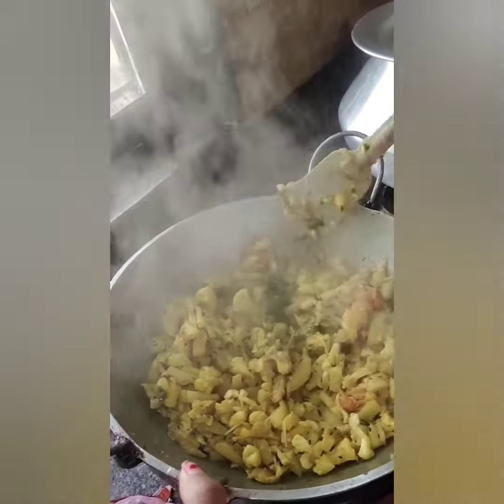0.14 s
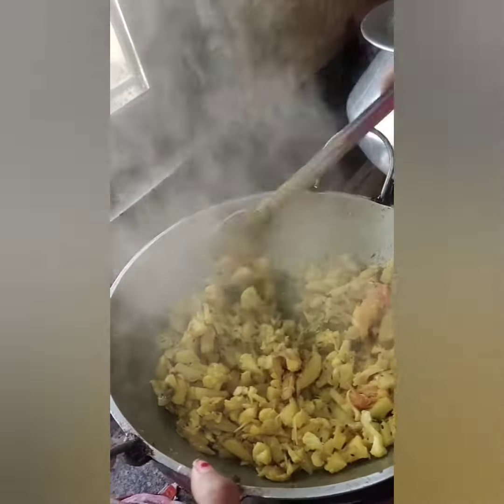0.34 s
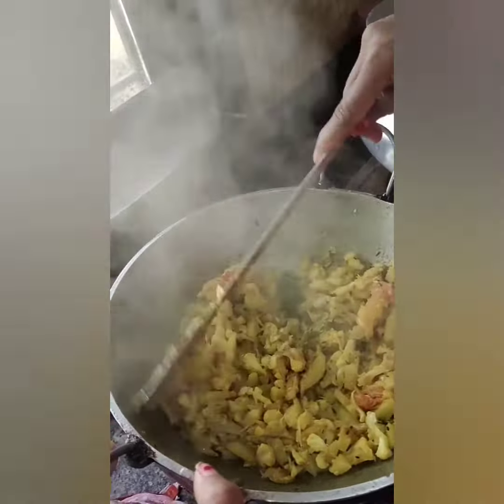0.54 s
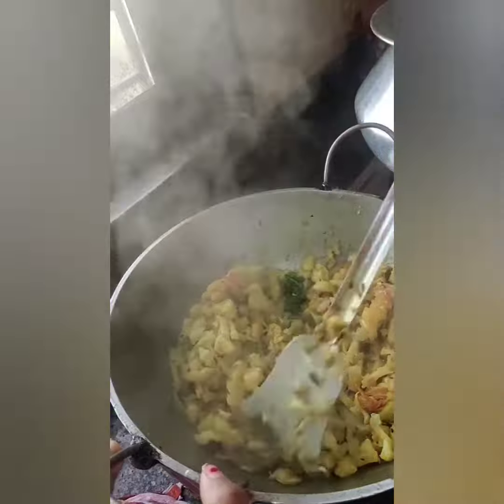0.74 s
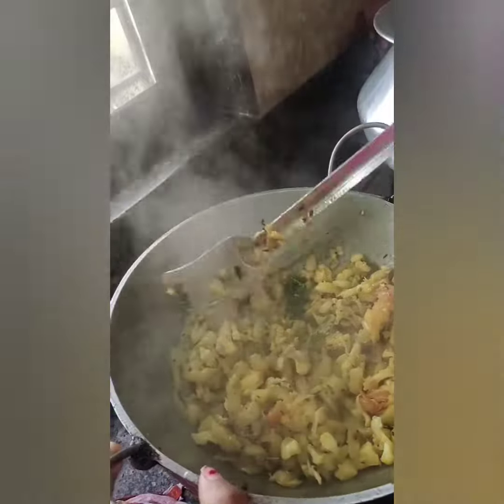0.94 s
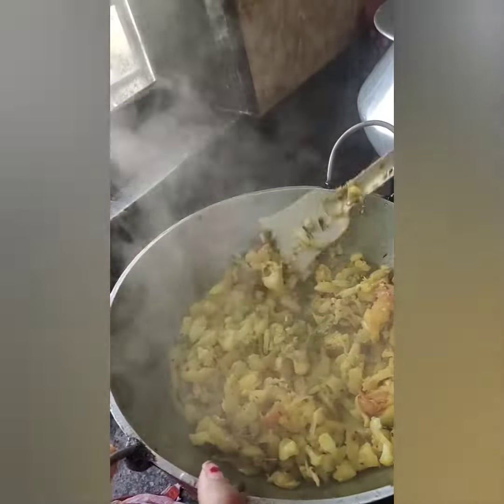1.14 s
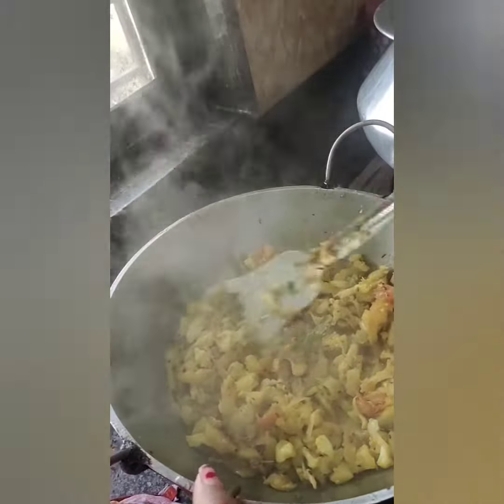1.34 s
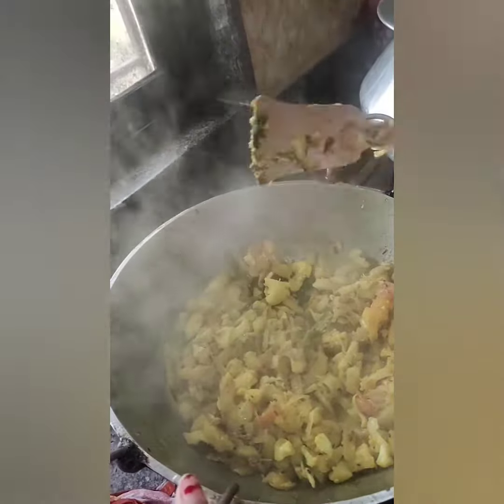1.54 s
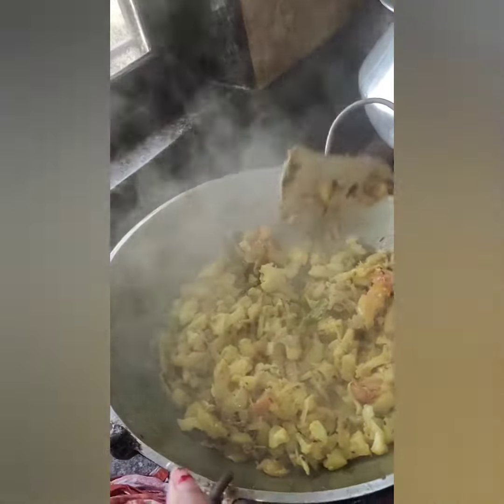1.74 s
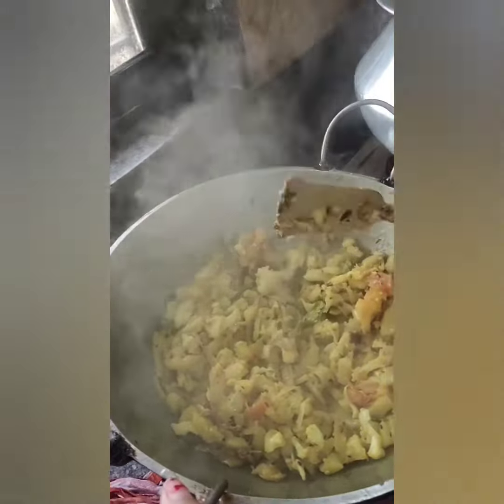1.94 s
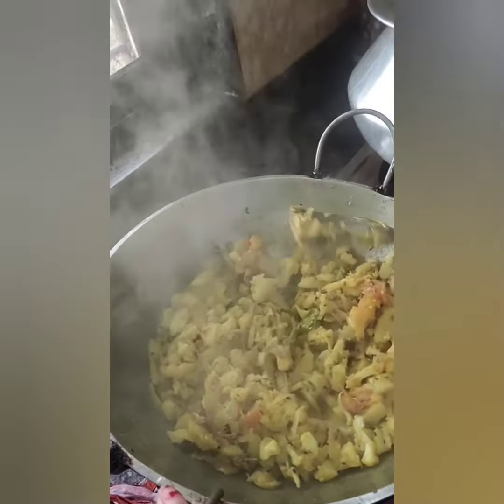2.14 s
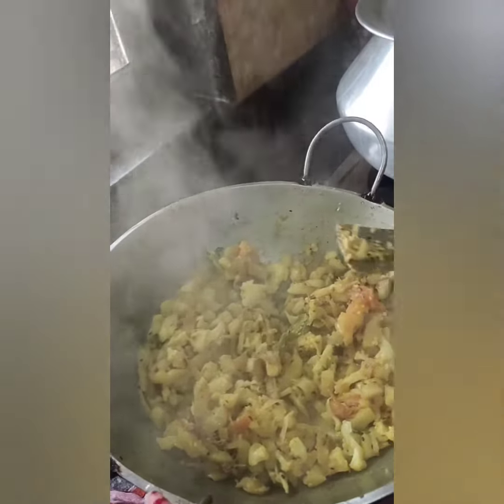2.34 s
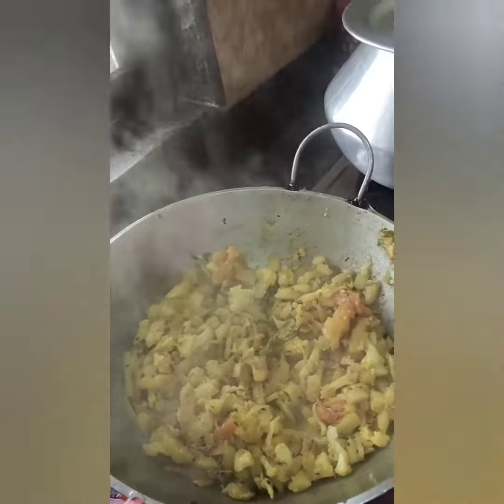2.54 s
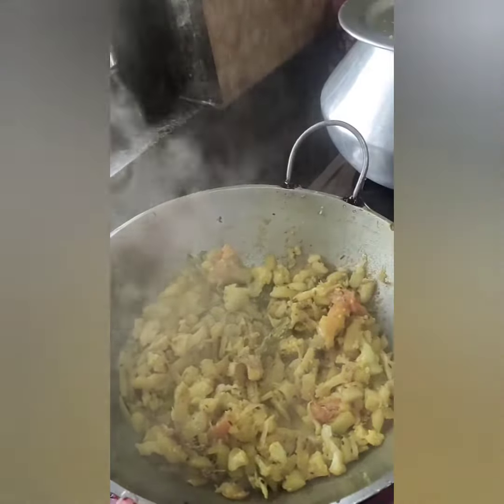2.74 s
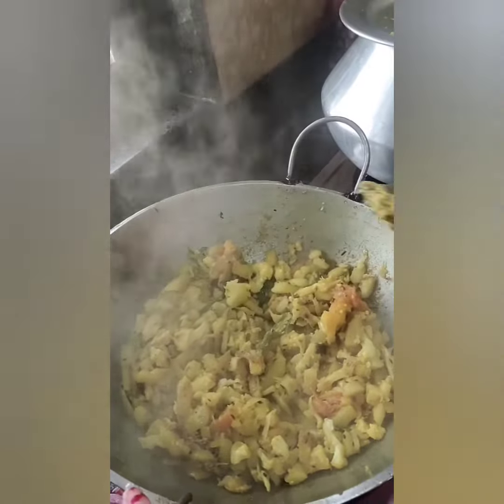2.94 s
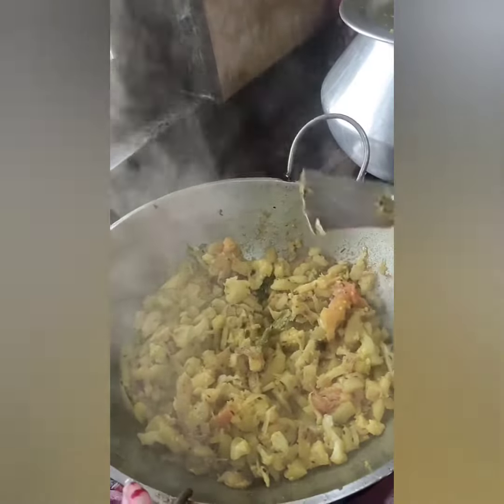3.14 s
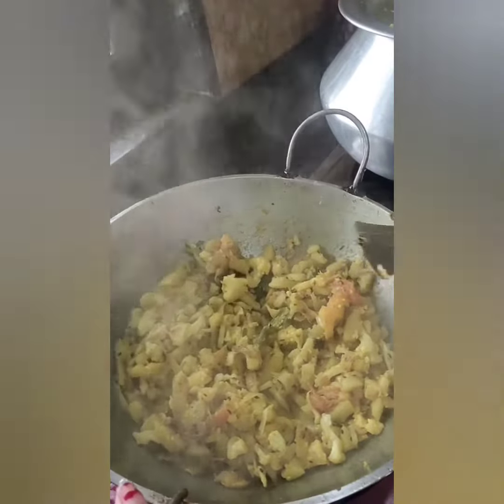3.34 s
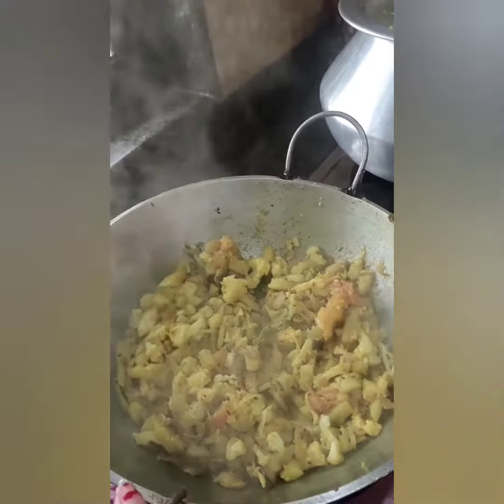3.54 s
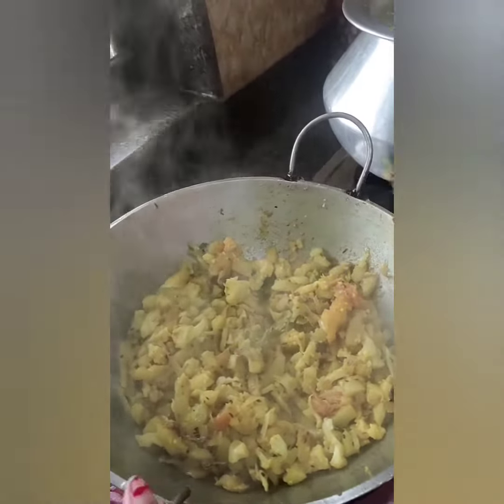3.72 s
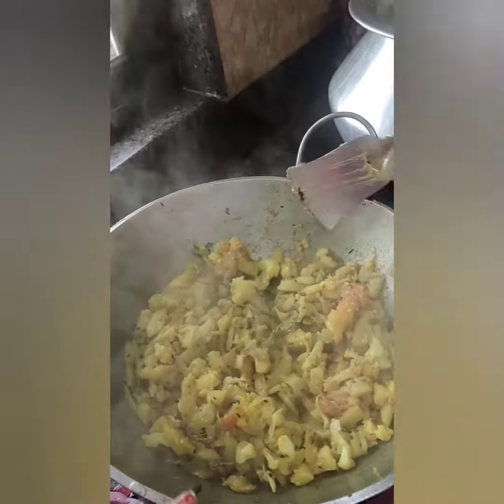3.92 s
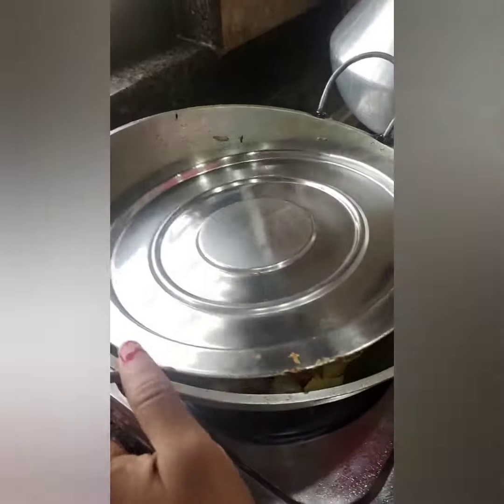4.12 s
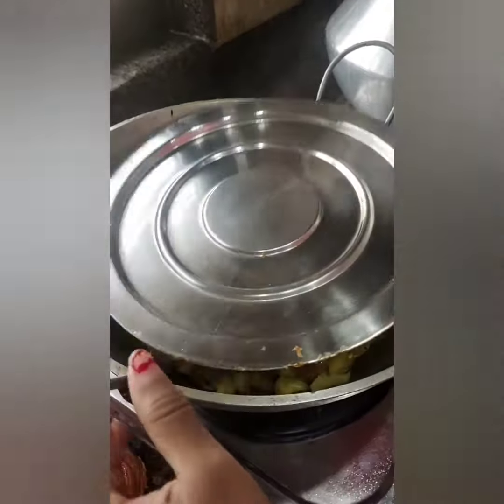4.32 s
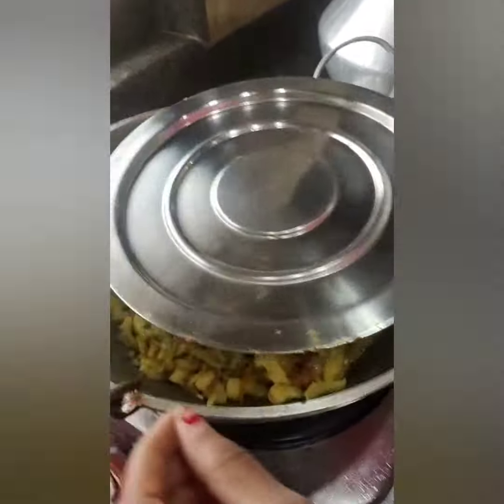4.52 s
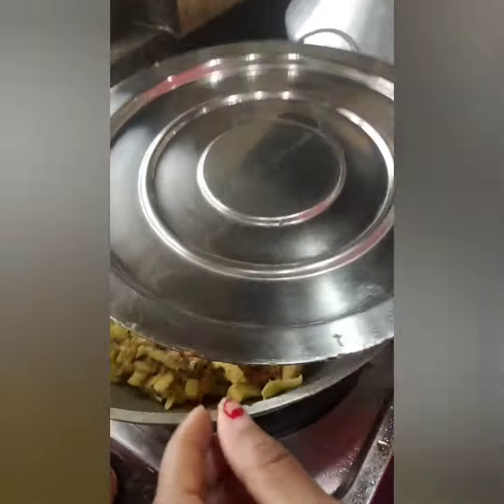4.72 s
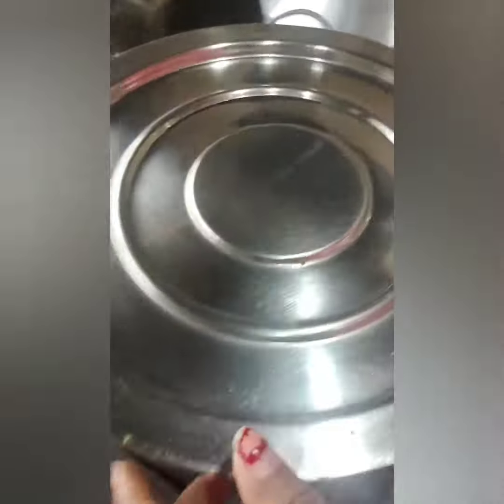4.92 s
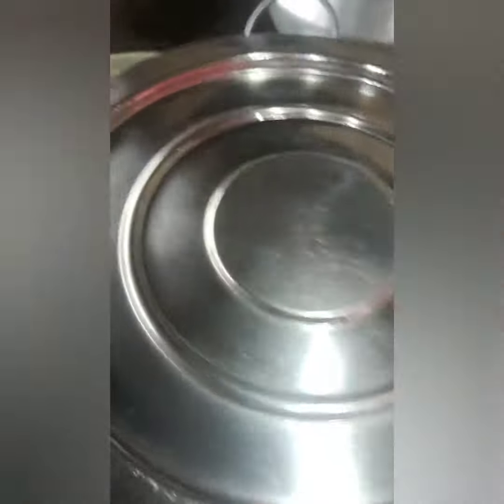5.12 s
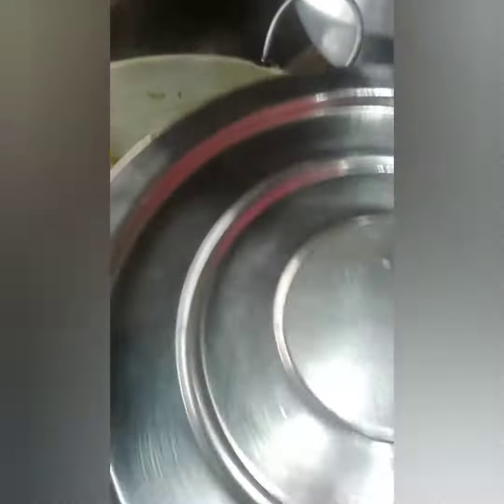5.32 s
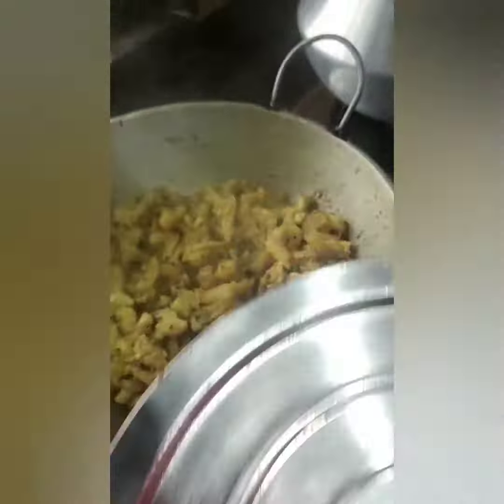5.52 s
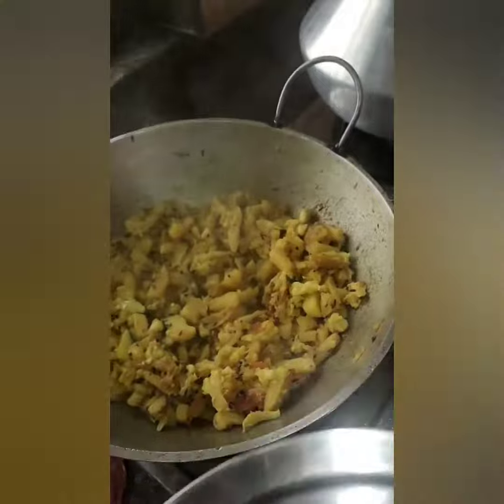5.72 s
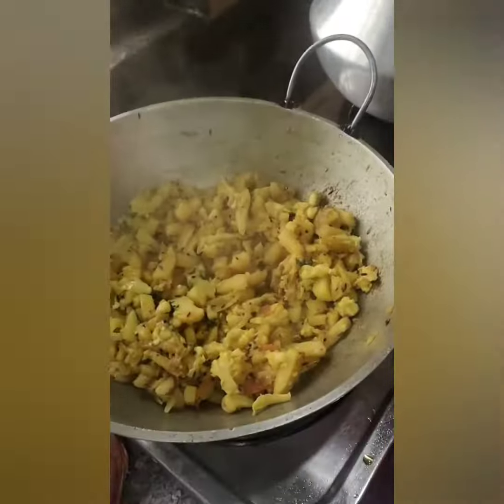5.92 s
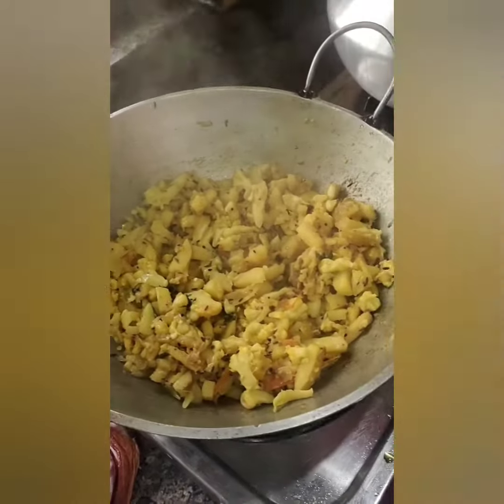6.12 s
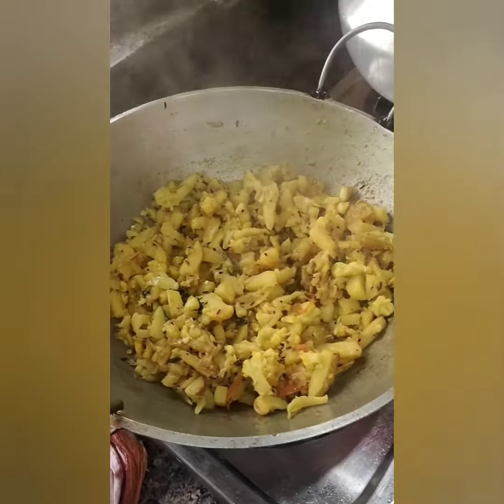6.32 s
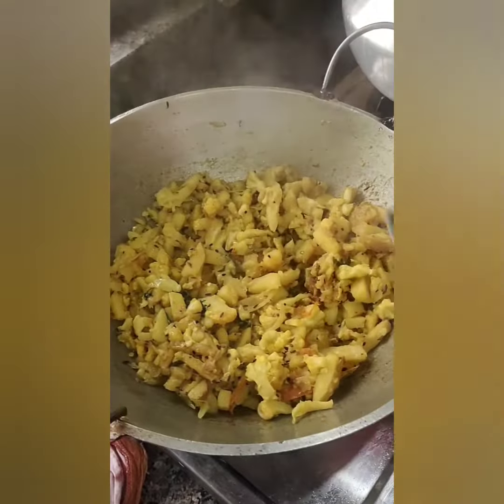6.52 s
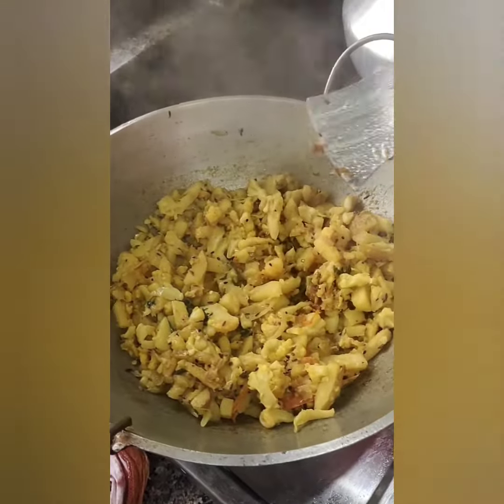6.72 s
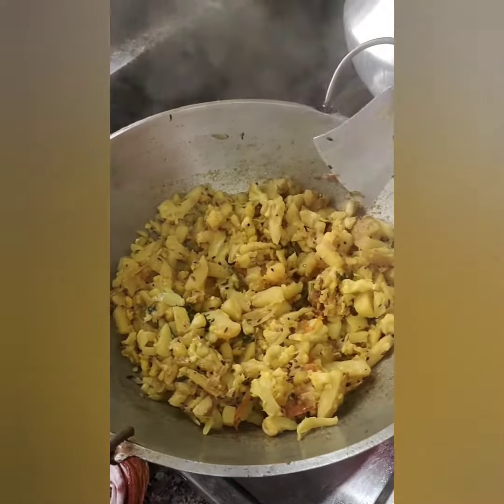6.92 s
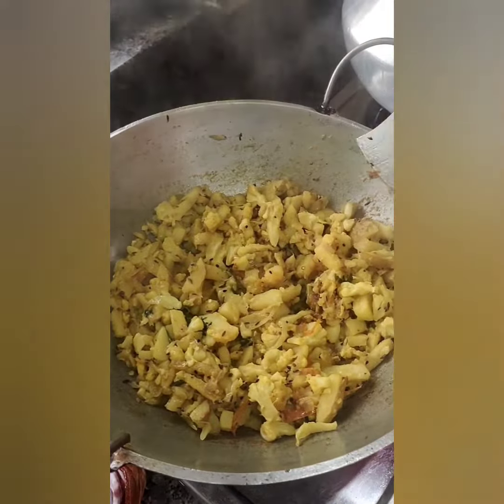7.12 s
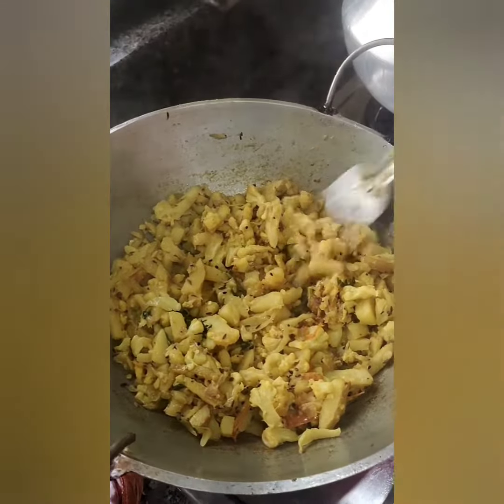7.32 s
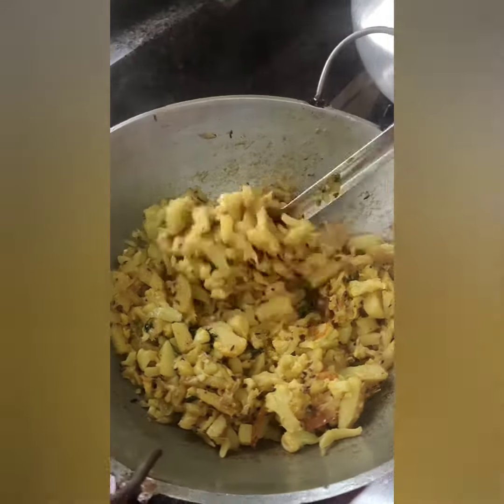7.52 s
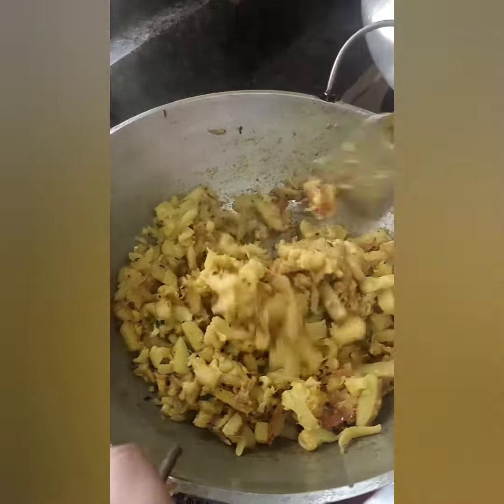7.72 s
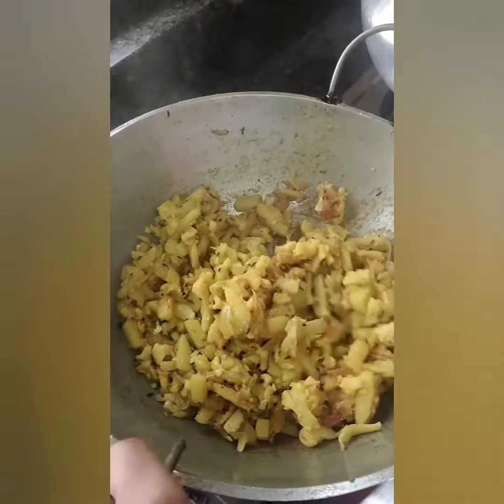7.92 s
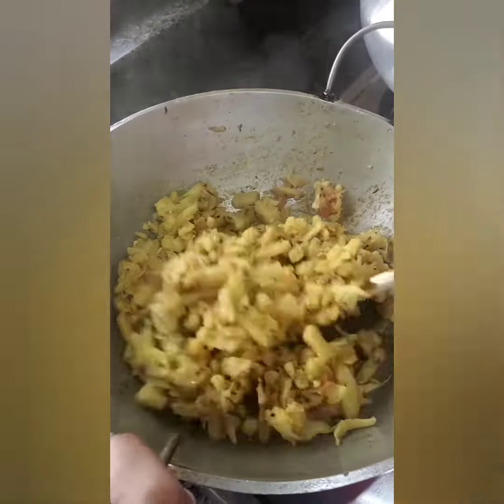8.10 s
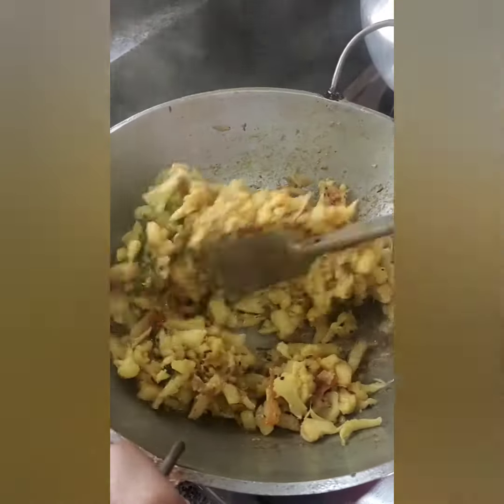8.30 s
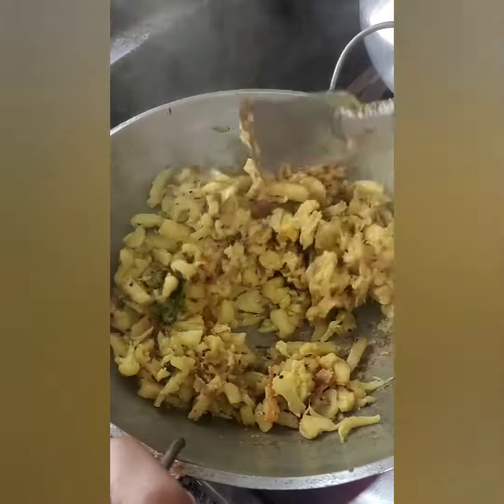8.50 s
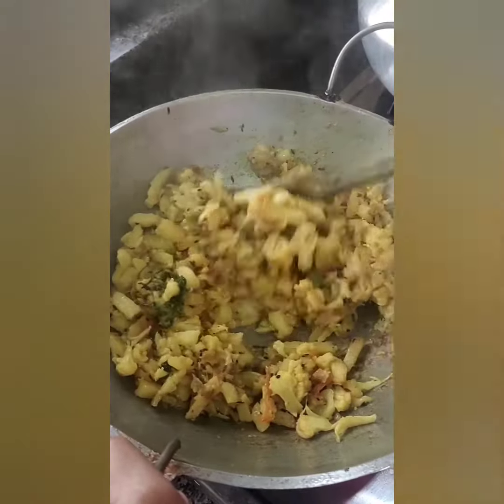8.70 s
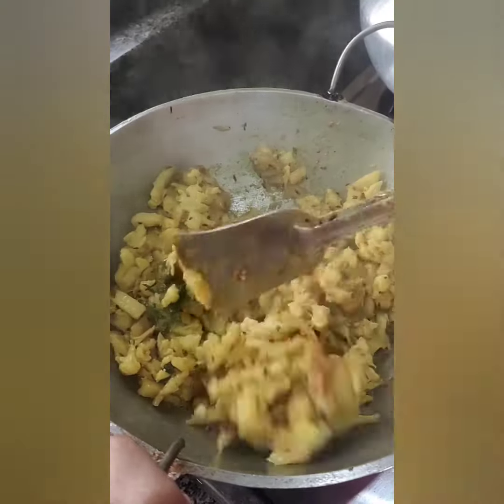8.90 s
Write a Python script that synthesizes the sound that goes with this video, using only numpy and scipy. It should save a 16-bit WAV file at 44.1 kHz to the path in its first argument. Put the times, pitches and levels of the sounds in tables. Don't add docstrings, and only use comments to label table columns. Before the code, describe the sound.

Vegetables sizzle in a metal pan over a low gas flame while a steel spatula knocks the rim, scrapes the wall and stirs.

```python
import sys
import numpy as np
from scipy import signal
from scipy.fft import rfft, irfft, next_fast_len
from scipy.io import wavfile
from scipy.ndimage import uniform_filter1d, map_coordinates

SR = 44100
rng = np.random.default_rng(int(sys.argv[2]) if len(sys.argv) > 2 else 0)


def volts(x):
    e = np.asarray(x, float) / 20
    return 10 ** e


def output_pcm(signal):
    pcm = np.clip(np.atleast_2d(signal).T, -1, 1) * 32767
    wavfile.write(sys.argv[1], SR, np.round(pcm).astype(np.int16))


N = 395119
FFT_SIZE = 2 * next_fast_len((N + SR // 3) // 2, real=True)

# (frequency [Hz], likeness [0-1])
ALIKE = [(60, .97), (150, .85), (340, .66), (800, .8), (1400, .4), (2300, .48), (5000, .2), (8000, .05)]
# (time [s], peak [dB], bowl answer [dB], chatter t60 [s])
RIM = [
    (1.8491, -12, -6, 0.22),
    (1.9947, -16, -1, 0.14),
    (2.229, -30, -9, 0.094),
    (3.2962, -22, -5.5, 0.15),
]


def unit(x):
    return x / np.sqrt(np.mean(x ** 2) + 1e-20)


def along(points, hz):
    f, value = np.transpose(points)
    return np.interp(np.log(hz + 1), np.log(f + 1), value)


def curve(points):
    s, value = np.transpose(points)
    return np.interp(np.arange(N) / SR, s, value)


def wobble(rate):
    knots = rng.standard_normal(int(N * rate / SR) + 4)
    return map_coordinates(knots, [np.arange(N) * rate / SR], order=1)


def filtered(x, response):
    spectrum = rfft(x, FFT_SIZE) * response(np.fft.rfftfreq(FFT_SIZE, 1 / SR))
    return irfft(spectrum, FFT_SIZE)[..., :N]


def resonances(f, peaks):
    total = 0
    for k, (centre, width, db) in enumerate(peaks):
        total = total + (-1) ** k * volts(db) * 1j * f * width / (centre * centre - f * f + 1j * f * width)
    return total


def ringing(modes):
    hz, db, t60 = np.transpose(modes)[..., None]
    t = np.arange(int(SR * min(t60.max(), 1 / 3))) / SR
    return np.sum(volts(db - 60 * t / t60) * np.sin(2 * np.pi * hz * t), axis=0)


def pair(spectrum, alike, lag_s, source=None):
    source = rng.standard_normal((2, N)) if source is None else source

    def mid_side(hz):
        turn = np.arccos(np.clip(along(alike, hz), -1, 1)) / 2
        return volts(along(spectrum, hz)) * [np.cos(turn), np.sin(turn)]

    mid, side = filtered(source, mid_side)
    return unit(np.array([np.roll(mid + side, round(lag_s * SR)), mid - side]))


def patchy(depth_db, bins, frames):
    z = signal.stft(rng.standard_normal((2, N)), nperseg=512)[2]
    field = uniform_filter1d(rng.standard_normal(z.shape[1:]), bins, axis=0)
    field = uniform_filter1d(field, frames, axis=1)
    return unit(signal.istft(z * volts(depth_db * unit(field)), nperseg=512)[1][:, :N])


def hiss():
    # (frequency [Hz], density [dB per Hz])
    left_hiss = [(7000, -36), (9500, -9), (12300, 2), (14000, -1), (16000, -28)]
    thin = unit(filtered(rng.standard_normal(N), lambda hz: volts(along(left_hiss, hz))))
    return volts(-59.0 + wobble(5)) * thin * [[1], [0]]


def kitchen():
    # (frequency [Hz], density [dB per Hz])
    kitchen_hum = [(130, -23.5), (220, -6.5), (256, -24.5), (383, -1.5), (439, -8), (477, -4), (713, -0.5),
                   (1010, -5), (1220, -7.5), (2280, -16.5), (2480, -16.5), (2650, -17), (6000, -26.5),
                   (7800, -54.5), (13200, -120)]
    # (time [s], level over the kitchen [dB])
    held = [
        (6.62, -1),
        (6.74, -2),
        (7.3, 1.5),
        (7.56, 4.5),
        (7.73, 1.5),
        (8.17, 1.5),
        (8.51, -0.1),
    ]
    held_db = curve(np.vstack([[(0, 0)], held]))
    return volts(-40 + held_db + .6 * wobble(6)) * pair(kitchen_hum, ALIKE, lag_s=.00046)


def flame():
    # (frequency [Hz], density [dB per Hz])
    roar = [(15, -83), (25, -40), (65, -19), (75, -26.5), (83, -13), (90, -8.5), (112, 2), (248, -12.5),
            (270, -10.5), (320, -15.5), (420, -47.5), (700, -120)]
    # (frequency [Hz], left-right likeness [0-1])
    flame_alike = [(40, .8), (65, .98), (125, .99), (250, 0.3)]
    # (time [s], level [dB])
    draught = [
        (0, -0.5),
        (2.47, 1.3),
        (2.62, -1.5),
        (2.86, 0.5),
        (4.6, 0.2),
        (4.97, 2),
        (5.67, 1),
        (7.1, 0.5),
        (8.96, 0.6),
    ]
    return volts(-41.5 + curve(draught) + 0.99 * wobble(15)) * pair(roar, flame_alike, lag_s=0)


def sizzle():
    # (time [s], sizzle level [dB])
    fry = [(0.0, -47.5), (0.15, -47), (0.39, -37.5), (0.64, -48), (3.29, -51), (3.75, -52.5), (4.4, -55),
           (4.94, -52), (5.88, -51.5), (6.01, -48.5), (6.62, -52.5), (7.16, -51.5), (7.524, -39.5),
           (7.674, -47.5), (7.9, -50), (8.03, -42.5), (8.742, -42), (8.96, -38)]
    # (frequency [Hz], density [dB per Hz])
    oil = [(880, -32), (1500, -15.5), (2220, -11), (3000, -5), (3480, -6), (5240, -8), (7230, 0),
           (8970, -8), (13100, -13), (14900, -14.5), (15500, -30.5)]
    calm_db, brighter_per_db = -50, 0.3553
    dry_from_s, dry_bright_db = 7.25, 2
    level_db = curve(fry)
    dryness = 2 * np.clip(np.arange(N) / SR - dry_from_s, 0, .5)
    bright_db = brighter_per_db * (level_db - calm_db) + dry_bright_db * dryness

    pops = (rng.random((2, N)) < .03) * volts(1.1 * rng.exponential(size=(2, N)))
    pops = pops * rng.choice([-1, 1], size=(2, N))
    bubbles = patchy(2.6, bins=5, frames=7) + .6 * unit(pops)
    fizz = pair(oil, ALIKE, 0, bubbles)
    top = filtered(fizz, lambda hz: hz > 9300)
    flicker_db = 1.4 * wobble(25) + 0.89 * wobble(90)
    return volts(level_db + 4.0 + flicker_db) * (fizz - top + volts(bright_db) * top)


def rubs():
    # (time [s], length [s], pitch [Hz], level [dB])
    sings = [
        (6.71, 0.064, 275, -44),
        (6.715, 0.046, 838, -27),
        (6.908, 0.022, 960, -30.5),
        (6.99, 0.15, 279.4, -37.5),
        (7.01, 0.11, 812, -28.5),
        (7.13, 0.11, 823, -34.5),
        (7.245, 0.062, 768, -31.5),
        (7.35, 0.046, 4250, -49),
        (0.391, .07, 1515, -45),
        (4.18, 0.061, 5400, -53),
    ]
    # (time [s], length [s], pitch [Hz], level [dB])
    shifts = [
        (1.854, 0.0052, 2200, -16.5),
        (1.88, 0.04, 513, -25.5),
        (2.0, 0.0032, 2200, -14),
        (2.03, 0.052, 370, -25.5),
        (2.462, 0.038, 785, -36.5),
        (2.49, 0.05, 1020, -38),
        (3.3, 0.01, 652, -20.5),
        (4.17, 0.045, 665, -38),
        (6.985, 0.12, 783, -25.5),
        (7.6, 0.16, 382, -34),
    ]
    # (time [s], length [s], pitch [Hz], level [dB])
    breaths = [
        (2.465, 0.064, 6500, -40),
        (4.2, 0.067, 13000, -54.5),
        (4.556, 0.0058, 11500, -34),
        (4.826, 0.027, 13000, -48),
        (5.252, 0.027, 13000, -65),
        (6.011, 0.09, 7850, -41),
        (6.115, .07, 11000, -42),
        (7.925, 0.053, 7550, -27.5),
        (8.17, 0.087, 7200, -33.5),
    ]
    # rows, pitch over width, left lag [ms]
    kinds = ((sings, 50, -0.19), (shifts, 6.6, .07), (breaths, 2.1, .15))
    t, sound = np.arange(N) / SR, np.zeros((2, N))
    swells = [(*row, sharp, lag_ms) for rows, sharp, lag_ms in kinds for row in rows]
    for s, length, hz, db, sharp, lag_ms in swells:
        width = hz / sharp
        near = slice(int((s - .2) * SR), int((s + 0.16) * SR))
        edges = [hz - width / 2, hz + width / 2]
        band = signal.butter(1, edges, "bandpass", fs=SR, output="sos")
        noise = signal.sosfilt(band, rng.standard_normal((2, SR // 2)))
        a, b = unit(noise[:, -len(t[near]):])
        left = volts(-9 * lag_ms) * np.roll(unit(a), round(lag_ms * SR / 1000))
        right = .88 * unit(a) + .45 * b
        swell = np.exp(-(2 * (t[near] - s) / length) ** 2)
        sound[:, near] += volts(db) * swell * [left, right]
    return sound


def casing(f):
    bass = f * f / (f * f - 330 ** 2 - 1.3j * f * 330)
    return bass * (1 - .55 * resonances(f, [(5200, 1000, 0)]))


def chatter():
    # (frequency [Hz], left-right likeness [0-1])
    close = [(200, .95), (700, .9), (1500, .75), (3000, .35), (7000, .35), (10000, .15)]
    return volts(2 * wobble(300)) * pair([(20, 0)], close, 0, patchy(2.6, bins=4, frames=4))


def contacts(grain, events, modes, colour, ring_db, dense_db, dense_t60, lag_s, rises, crack_db):
    edges_hz = [0, 1400, 5000, 20000]
    snap_t60 = 0.014
    t = np.arange(SR // 2) / SR
    force = np.zeros((3, N + SR))
    for s, db, bowl_db, clank_db, t60, drag in events:
        dying = volts(-60 * np.maximum(t - drag, 0) / t60)
        snap = volts(db + crack_db - 60 * t / snap_t60)
        for band, (level_db, rise) in enumerate(zip((bowl_db, clank_db, 0), rises)):
            bounces = volts(db + level_db) * dying * (1 - np.exp(-t / rise))
            force[band, round(s * SR):][:len(t)] += bounces + volts(level_db) * snap
    grain = np.array([np.roll(grain[0], round(lag_s * SR)), grain[1]])

    draws = rng.random(size=(160, 3))
    crowd_hz = 200 + 15000 * draws[:, 0] ** 1.3
    crowd = ringing(np.c_[crowd_hz, 9 * draws[:, 1], dense_t60 * (.5 + draws[:, 2])])
    f = np.fft.rfftfreq(FFT_SIZE, 1 / SR)
    shell = 1 + rfft(volts(dense_db) * crowd / np.linalg.norm(crowd), FFT_SIZE)
    sound = 0
    for band, broad in enumerate(colour):
        low, high = edges_hz[band:band + 2]
        lines = volts(ring_db) * ringing([mode for mode in modes if low < mode[0] < high])
        steel = resonances(f, broad) * shell + rfft(lines, FFT_SIZE)
        steel = steel / np.sqrt(np.pi * broad[0][1] / SR)
        sound = sound + rfft(force[band, :N] * grain, FFT_SIZE) * steel
    return irfft(sound * casing(f), FFT_SIZE)[:, :N]


def stirring(grain):
    # (time [s], peak [dB], chatter t60 [s], clank [dB])
    edge = [
        (0.2603, -10, 0.071, -12.5),
        (0.3152, -21.5, 0.21, -20),
        (7.4994, -28, 0.088, -20),
        (7.8522, -7.5, 0.11, -35),
        (8.8233, -31, 0.082, -25),
    ]
    # (time [s], peak [dB], chatter t60 [s], clank [dB])
    flat = [
        (0.4486, -27, 0.092, -22),
        (0.6908, -32.5, 0.12, -4),
        (1.6408, -33, 0.13, -1),
        (4.5527, -45, 0.1, -15),
        (6.0832, -24.5, 0.18, -7.5),
        (7.347, -25.5, 0.44, -13),
        (7.3821, -9.5, 0.041, -2.5),
        (7.707, -31.5, 0.06, -15),
        (8.602, -30.5, 0.1, -3),
        (8.7509, -11.5, 0.084, -16),
    ]
    # (time [s], peak [dB], chatter t60 [s])
    lumps = [
        (0.514, -35, 0.067),
        (1.0882, -39, 0.12),
        (5.5978, -37, 0.12),
        (5.9275, -39, 0.13),
        (7.5542, -29, 0.34),
        (7.6429, -31, 0.12),
        (8.398, -31.5, 0.11),
    ]
    # (frequency [Hz], level [dB], t60 [s])
    damped = [(1124, -21, .04), (2170, -34.5, 0.047), (3320, -5, 0.028), (4250, -12, .04),
              (7100, -12.5, 0.027), (7150, -16.5, 0.05), (7480, -10, 0.04)]
    # (frequency [Hz], width [Hz], level [dB])
    food_colour = [
        [(800, 990, 0.0014)],
        [(2200, 1300, -6), (3950, 1100, 0.8)],
        [(7140, 760, 2.5), (9580, 1600, -28.5), (11170, 3100, -11)],
    ]
    lumps = [(*row, -22) for row in lumps]
    touches = []
    for rows, bowl_db in ((edge, -19), (flat, -14), (lumps, 1.5)):
        touches += [(s, db, bowl_db, clank_db, t60, 0.0023) for s, db, t60, clank_db in rows]
    return volts(-11) * contacts(grain, touches, damped, food_colour, ring_db=-26.0, dense_db=-1,
                               dense_t60=0.065, lag_s=.0002, rises=(.001, .0005, .0005), crack_db=2.0)


def scraping(grain):
    # (time [s], peak [dB], bowl answer [dB], drag [s])
    scrape = [
        (6.6815, -10, -18.5, 0.0023),
        (6.893, -9.5, -25, 0.057),
        (7.2164, -35.5, -7, 0.026),
    ]
    # (frequency [Hz], level [dB], t60 [s])
    bowl = [(275, -3, 0.23), (646, -19, 0.33), (768, -9.5, 0.29), (794, -4, 0.4), (960, 1, 0.14),
            (1702, -1, 0.17), (1916, -7, 0.17), (2230, -10, 0.26), (3312, -12.5, 0.59), (4250, -19.5, .15),
            (5400, -3.5, 0.12), (6800, -26, 0.23), (7600, -9, 0.07), (8700, -12.5, 0.1)]
    # (frequency [Hz], width [Hz], level [dB])
    bowl_colour = [
        [(814, 71, 0), (1235, 400, -42)],
        [(2070, 1540, -0.52), (3970, 960, 0.47)],
        [(7100, 1260, 1), (9240, 290, -38.5), (11600, 3700, -16)],
    ]
    clank_db, t60 = -7, 0.32
    drags = [(s, db, bowl_db, clank_db, t60, drag) for s, db, bowl_db, drag in scrape]
    sound = contacts(grain, drags, bowl, bowl_colour, ring_db=-38.5, dense_db=0, dense_t60=0.047,
                     lag_s=-.00034, rises=(.015, .002, .0005), crack_db=8)
    return volts([[-8], [-11]]) * sound


def knocking(grain):
    # (frequency [Hz], level [dB], t60 [s])
    blade = [(370, -7.5, 0.24), (495, -9.5, 0.32), (661, -6.5, 0.29), (943, -8, 0.15), (1580, -15, 0.057),
             (2640, -1, 0.083), (2200, -2.5, 0.045), (3213, -8.5, 0.16), (6589, -9.5, 0.12),
             (7100, -14.5, 0.27), (7784, -33, 0.23), (8300, -29, .22)]
    # (frequency [Hz], width [Hz], level [dB])
    blade_colour = [
        [(460, 390, -4), (1134, 410, 0.5)],
        [(2200, 460, 1), (4140, 1030, 3.5)],
        [(6160, 1400, 4), (7450, 750, 5.5), (9540, 1200, -1.5), (12960, 2700, -6.5)],
    ]
    clank_db, drag_s = -9, 0.0023
    knocks = [(s, db, bowl_db, clank_db, t60, drag_s) for s, db, bowl_db, t60 in RIM]
    return volts(-9.5) * contacts(grain, knocks, blade, blade_colour, ring_db=-39, dense_db=-5.5,
                                dense_t60=0.027, lag_s=0, rises=(.008, .0003, .0003), crack_db=6)


def peal():
    peal_hz = [2030, 4290, 6240, 7220]
    # (level [dB], t60 [s])
    peal_decay = [(-12, .28), (-15, .29), (-12, .3), (-15, .24)]
    t, sound = np.arange(SR // 3) / SR, np.zeros((2, N))
    onset = 1 - np.exp(-t / 0.0014)
    for s, db, *_ in RIM:
        for hz, (ring_db, t60) in zip(peal_hz, peal_decay):
            phase = rng.uniform(0, 3.1, size=(2, 1))
            line = np.sin(2 * np.pi * hz * t + phase)
            sound[:, round(s * SR):][:, :len(t)] += volts(db + ring_db - 60 * t / t60) * onset * line
    return sound


def room(x):
    # (frequency [Hz], t60 [s])
    walls = [(300, 0.67), (3000, 0.59), (12000, 0.37)]
    hz, t, z = signal.stft(rng.standard_normal((2, SR // 2)), SR, nperseg=256)
    tail = signal.istft(z * volts(-60 * t / along(walls, hz)[:, None]), SR, nperseg=256)[1]
    late = np.pad(x, ((0, 0), (300, 0)))
    return signal.fftconvolve(late, tail / np.linalg.norm(tail[0]), axes=1)[:, :N]


def scene():
    background = hiss() + kitchen() + flame() + sizzle() + rubs()
    grain = chatter()
    steel = stirring(grain) + scraping(grain) + knocking(grain)
    return background + steel + volts(-9.5) * room(steel) + peal()


def thrift(x):
    # (frequency [Hz], density [dB per Hz])
    faintest = [(9000, -140), (9800, -94), (13300, -95), (14000, -91), (15400, -88), (16400, -60)]
    # (frequency [Hz], level [dB])
    masked = [(2000, -70), (3600, -27), (5500, -21), (9000, -25), (14000, -28), (15300, -24), (16200, -8)]
    hz, _, z = signal.stft(x, SR, nperseg=1024, scaling="psd")
    hz = hz[:512]
    bands = (2 * abs(z[:, :512]) ** 2).reshape(2, 64, 8, -1).mean(axis=2)
    bands = np.repeat(uniform_filter1d(bands, size=3, axis=2), 8, axis=1)
    loudest = bands[:, hz > 2500].max(axis=1, keepdims=True)
    least = volts(2 * along(faintest, hz))[:, None] + loudest * volts(2 * along(masked, hz))[:, None]
    kept = np.pad(bands > least, ((0, 0), (0, 1), (0, 0)))
    return signal.istft(z * kept, SR, nperseg=1024, scaling="psd")[1][:, :N]


def top_cut(x):
    return signal.sosfilt(signal.butter(12, 16640, fs=SR, output="sos"), x)


def record(dry):
    # (frequency [Hz], level [dB])
    right_port = [(300, 0), (800, 1), (4000, 0), (8500, -1), (10000, -6), (12500, -7), (15000, -3)]
    # (start [s], end [s])
    pause = (4.0, 4.145)
    low_start_db, high_start_db, recover_s = -16.5, -4, 0.088
    spare_db, fade_in_s = 12.5, 0.0072
    ports = filtered(dry, lambda hz: volts([0 * hz, along(right_port, hz)]))
    t = np.arange(N) / SR
    climb = (t > pause[0]) * np.exp(-np.maximum(t - pause[1], 0) / recover_s)
    low = filtered(ports, lambda hz: 1 / (1 + (hz / 4500) ** 4))
    ports = volts(low_start_db * climb) * low + volts(high_start_db * climb) * (ports - low)
    spare = volts(spare_db * climb)
    ports = thrift(spare * ports) / spare
    ports = ports / (1 + abs(ports / .95) ** 4) ** (1 / 4)
    running = (t < pause[0]) + np.clip((t - pause[1]) / fade_in_s + .5, 0, 1)
    return top_cut(ports * running)


dry = scene()
out = record(dry)
output_pcm(out)
```